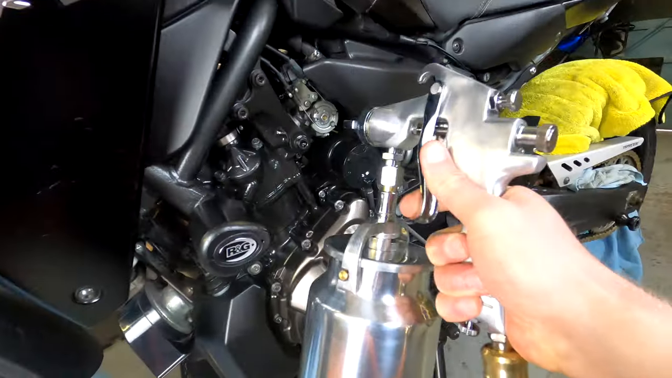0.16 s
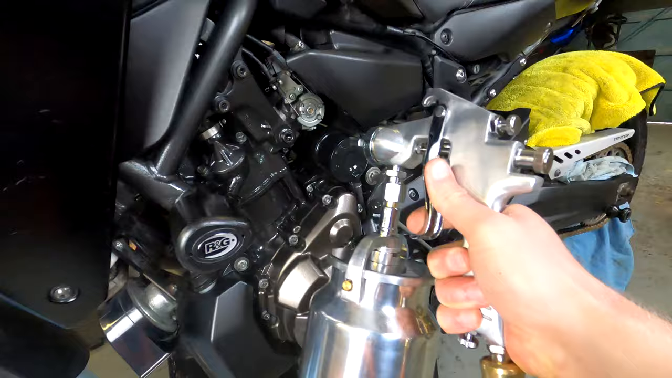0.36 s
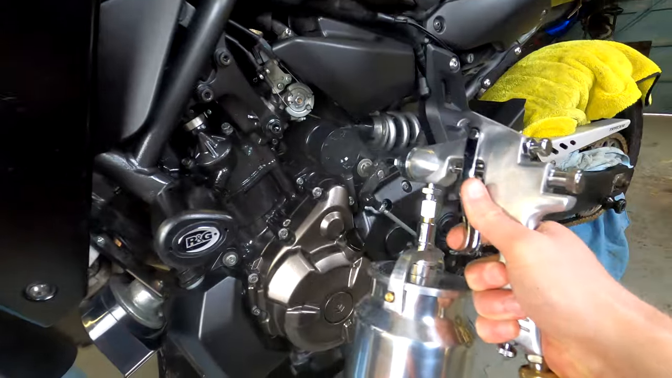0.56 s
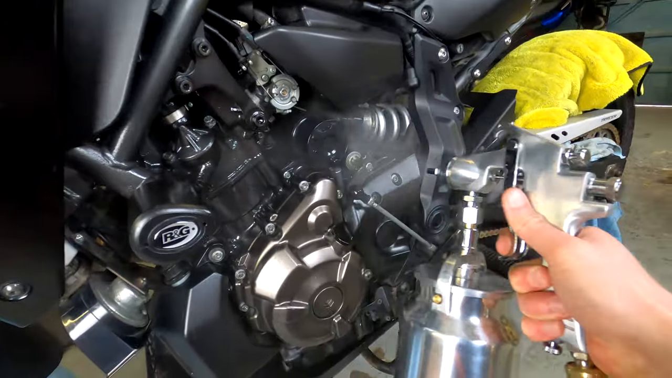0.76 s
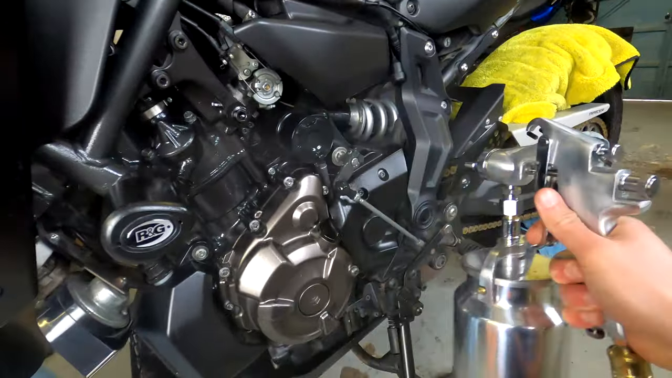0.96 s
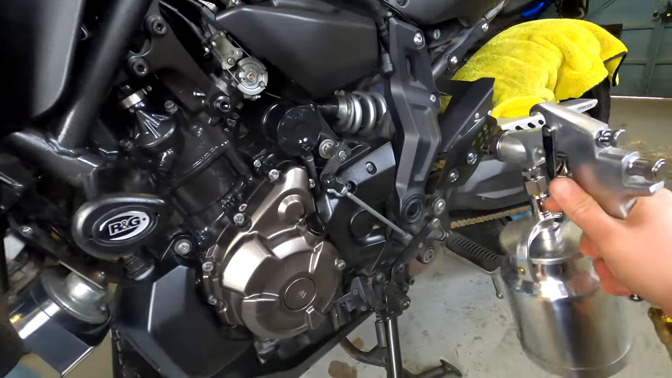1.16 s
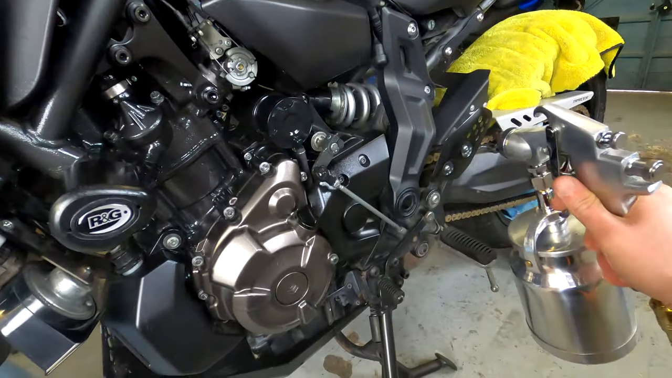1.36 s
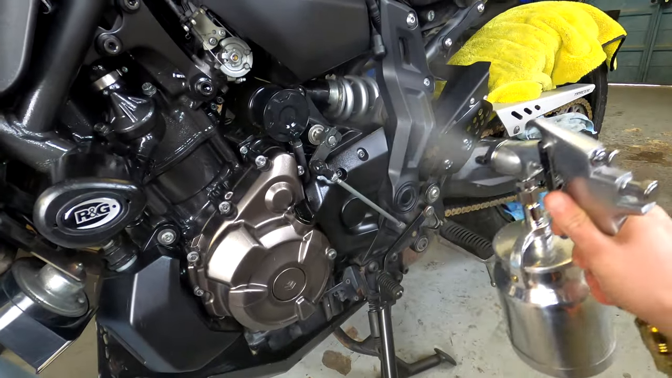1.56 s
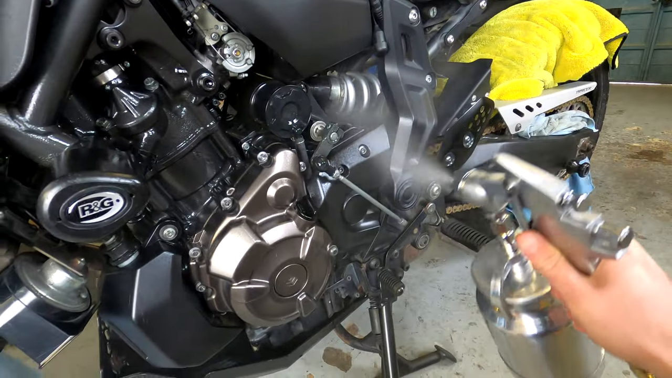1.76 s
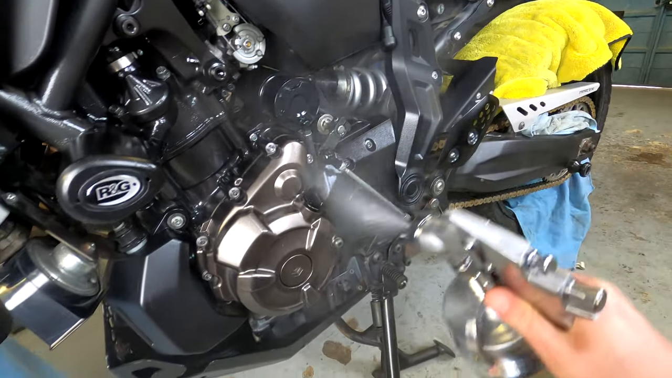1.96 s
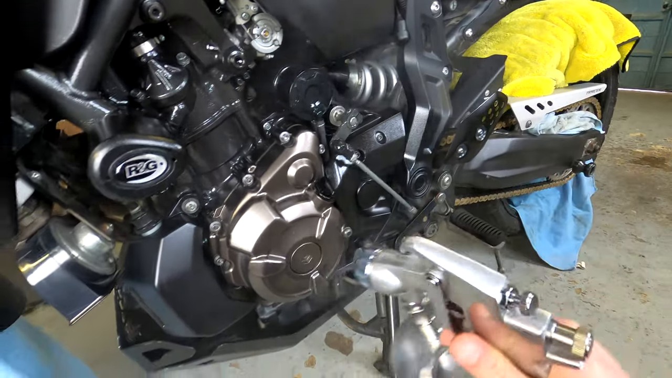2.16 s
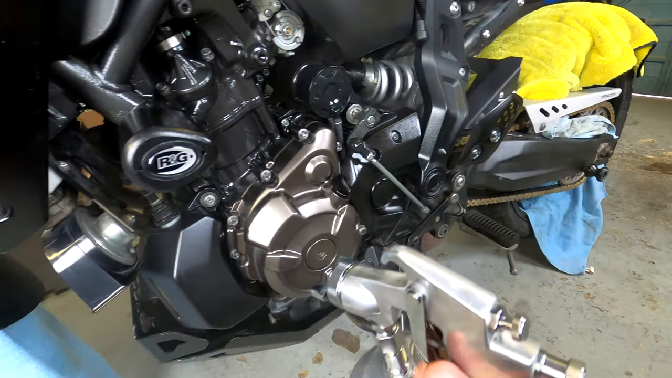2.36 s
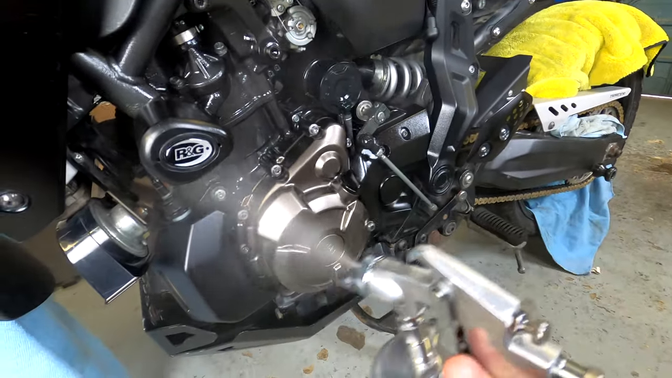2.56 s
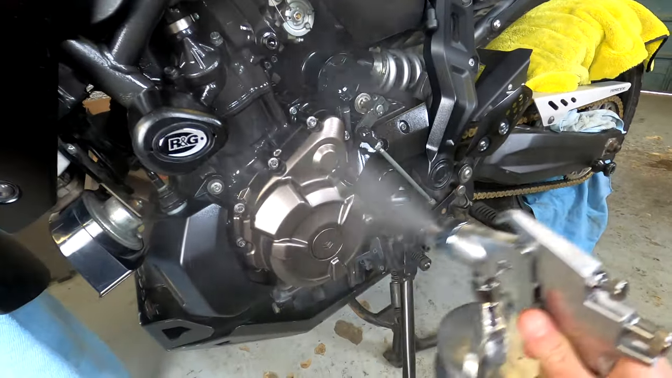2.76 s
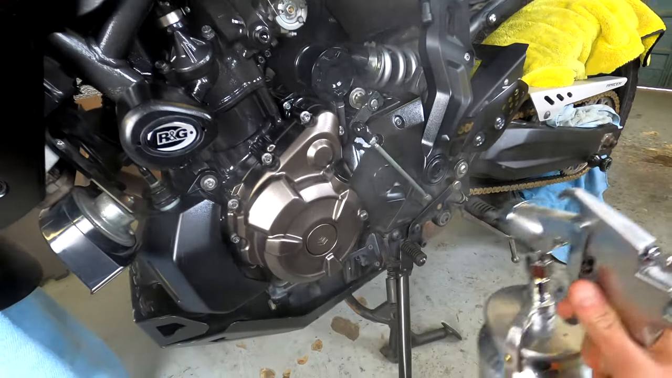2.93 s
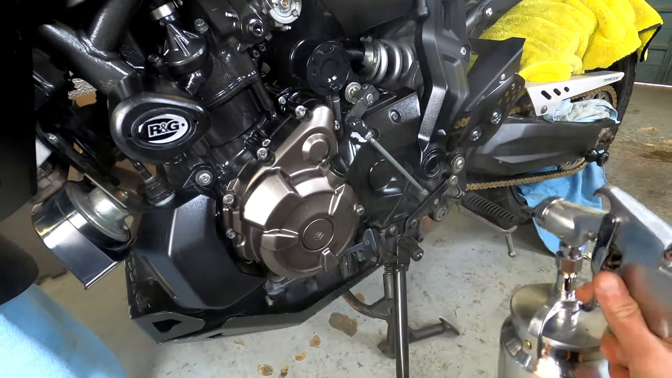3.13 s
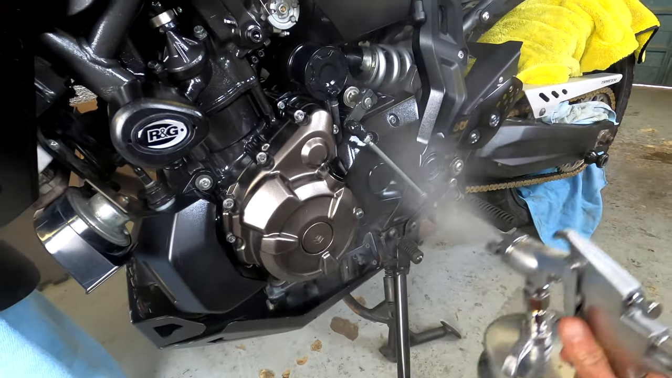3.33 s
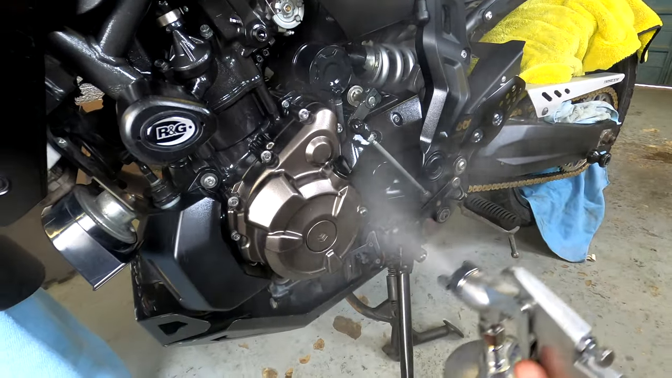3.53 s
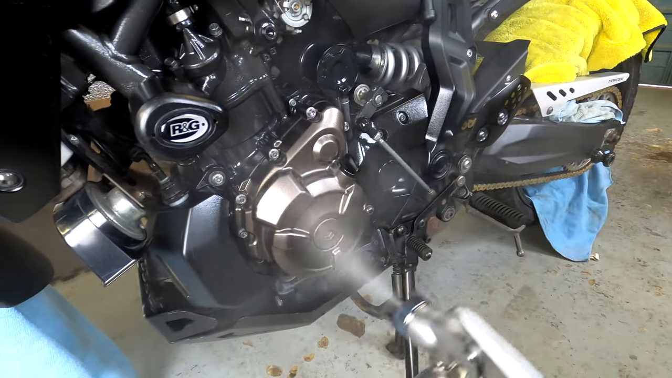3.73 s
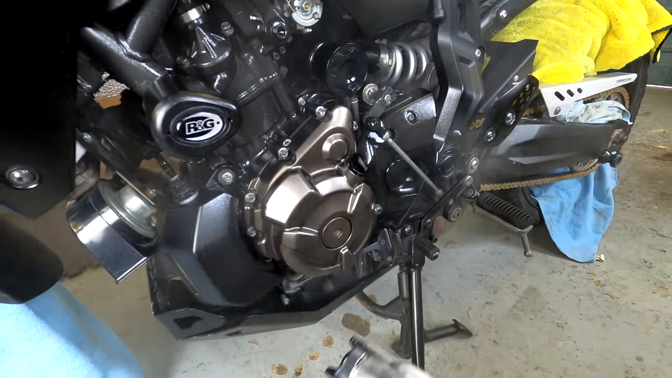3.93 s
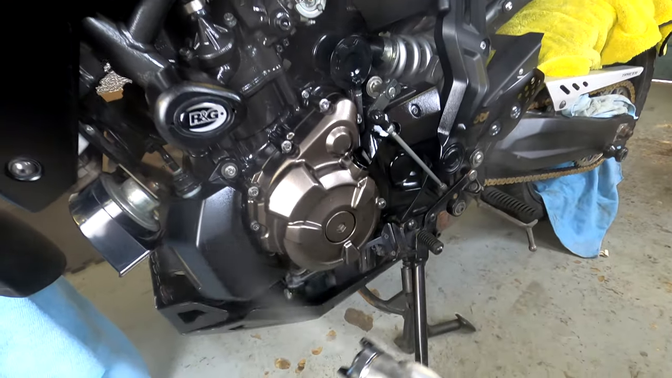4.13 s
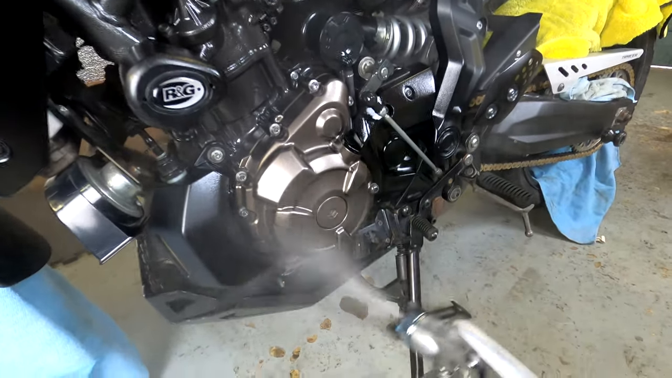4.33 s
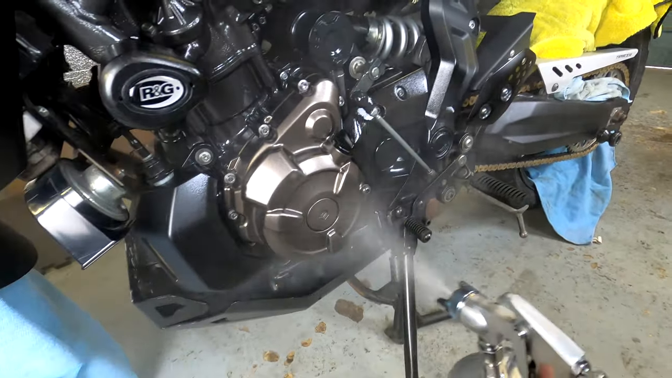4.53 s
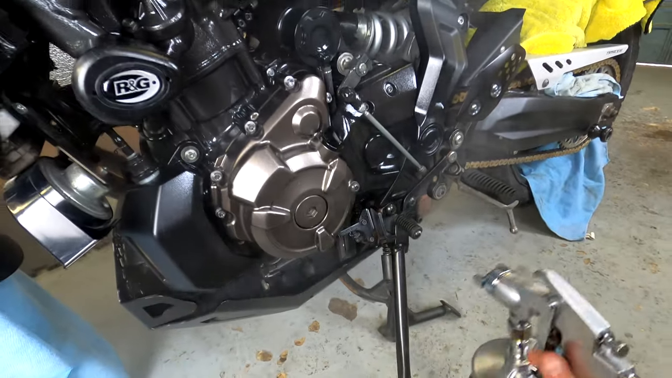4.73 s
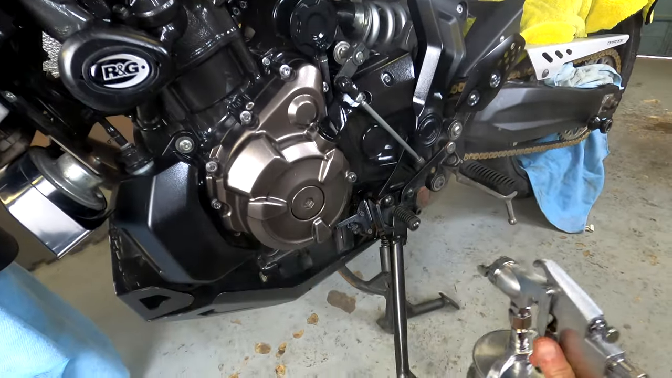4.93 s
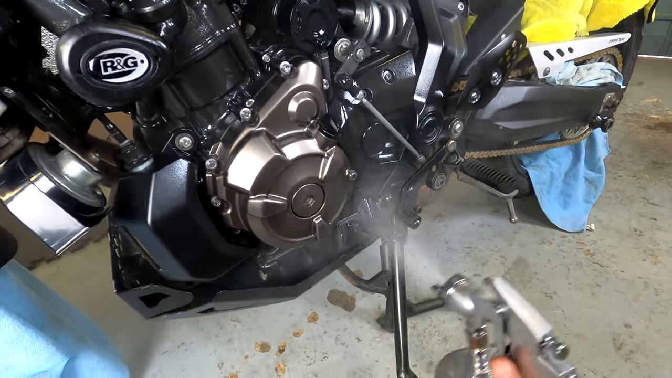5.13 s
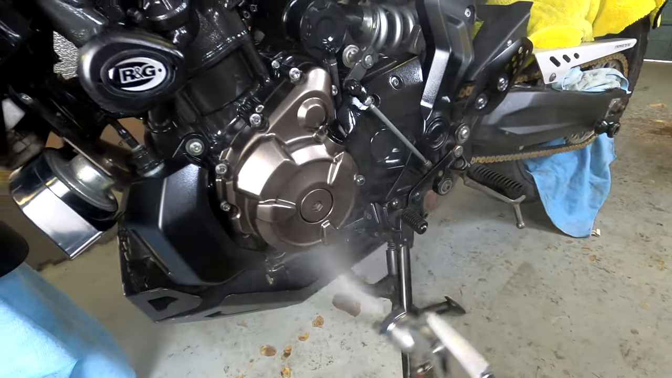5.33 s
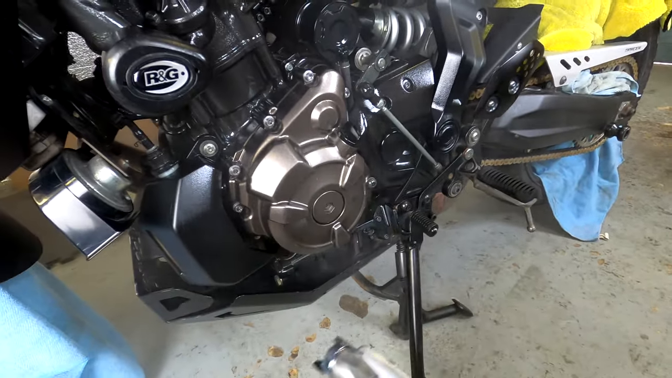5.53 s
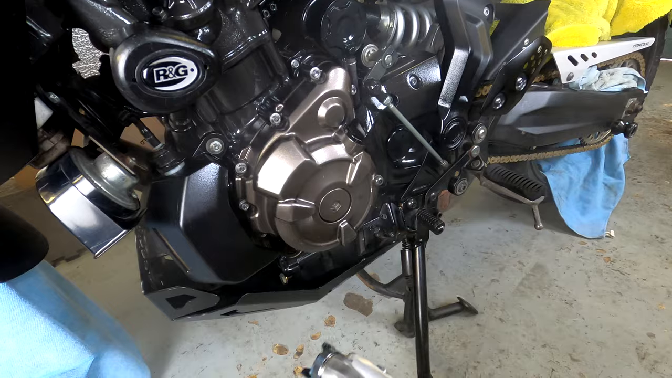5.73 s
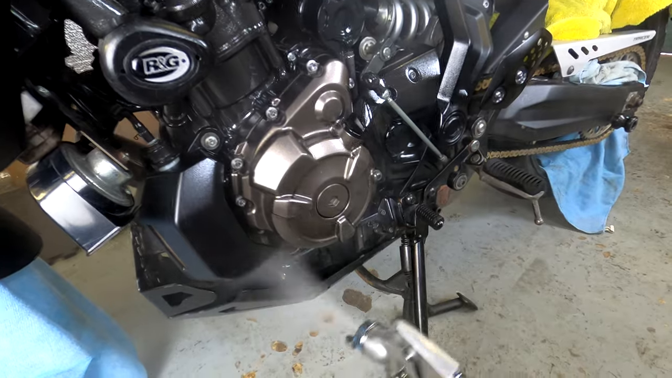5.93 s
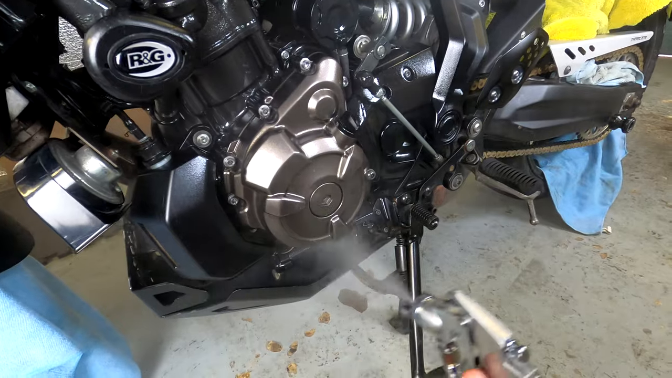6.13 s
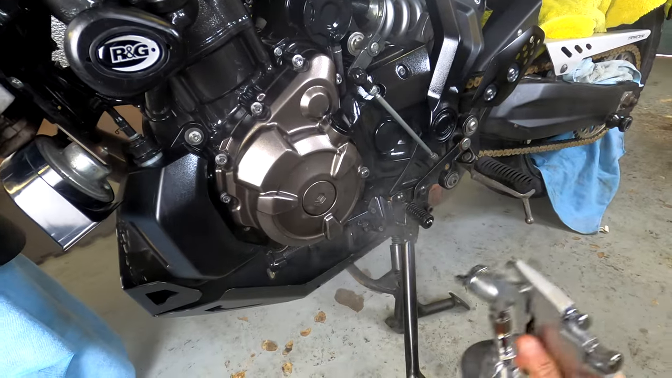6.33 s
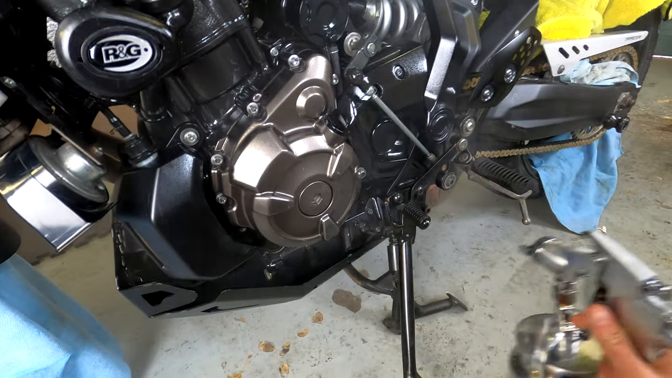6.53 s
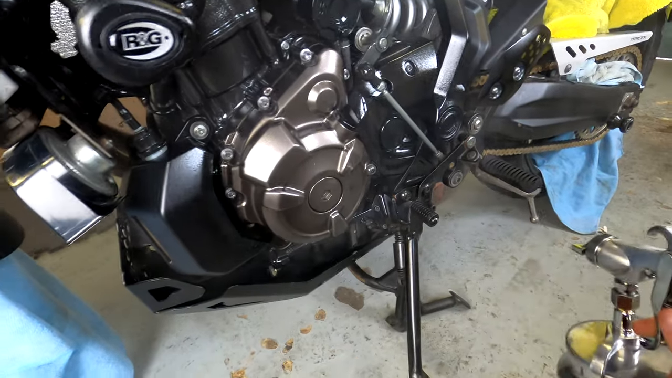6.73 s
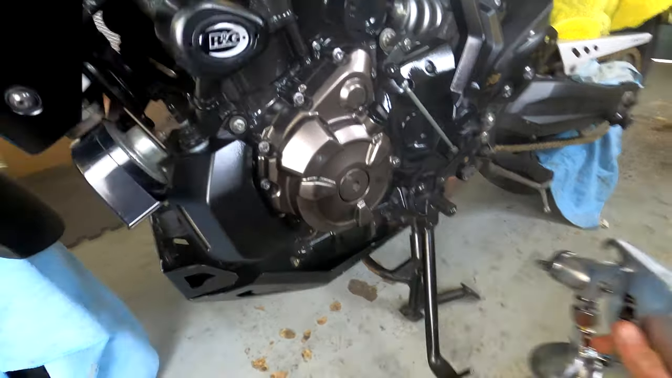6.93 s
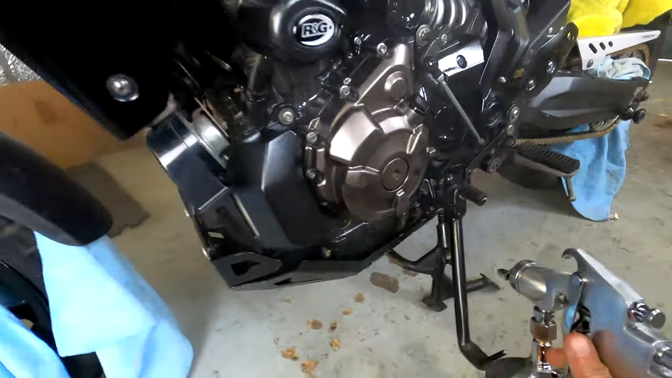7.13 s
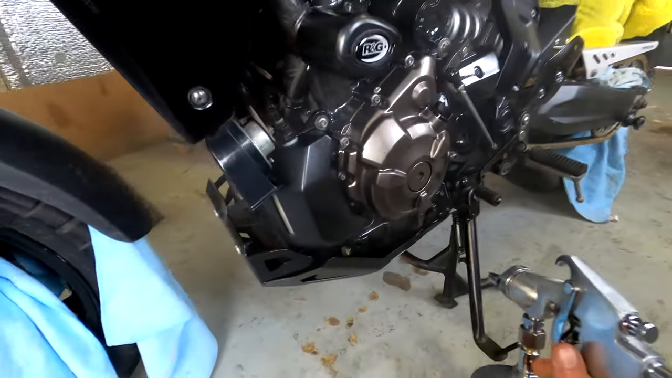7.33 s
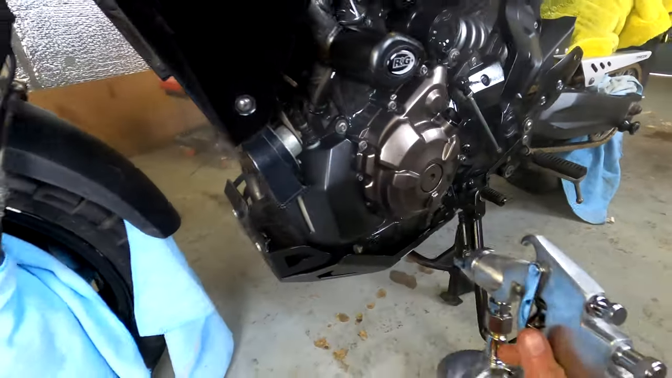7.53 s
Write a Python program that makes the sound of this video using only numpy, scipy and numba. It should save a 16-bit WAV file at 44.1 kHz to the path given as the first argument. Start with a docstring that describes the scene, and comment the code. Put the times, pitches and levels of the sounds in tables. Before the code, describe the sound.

Seven loud, airy spray bursts, roughly two thirds of a second each after a longer first one, with short gaps between. The hiss starts hard, sags as pressure drops, and mixes with wet splashing in engine cavities. Every release gives a soft pop and a brief ring from the gun. Faint air leakage and cloth fill the pauses, then comes a short shoe scuff. Close stereo pickup, small garage, short echo, quiet low room tone.

```python
"""Spray gun on an engine, small garage

A compressed-air spray gun coats a motorcycle engine in seven bursts, an arm's length from the microphone.
Each burst is shaped noise: a bright nozzle hiss that settles as the hose pressure sags, and a splash that
rings in the engine's hollows. A pressure pulse thumps as the valve shuts; small ticks ring the gun.
Filtered noise makes the leak whistle after the first release, the cloth, a late shoe scuff and a low rumble
under low drones; all but rumble, room tone, puffs and drones echo off the close walls."""
import sys
import numpy as np
from scipy import signal
from scipy.fft import rfft, irfft, next_fast_len
from scipy.io import wavfile
from numba import njit

SR = 44100
rng = np.random.default_rng(int(sys.argv[2]) if len(sys.argv) > 2 else 0)


def to_wav(s):
    """Save 16-bit WAV."""
    ch = np.atleast_2d(s).T  # columns
    pcm = np.round(np.clip(ch, -1, 1) * 32767)  # PCM
    wavfile.write(sys.argv[1], SR, pcm.astype(np.int16))


N = 338952
FFT_SIZE = next_fast_len(N)
T, HZ = np.arange(N) / SR, np.fft.rfftfreq(FFT_SIZE, 1 / SR)

# Trigger pulls, levels before the trims in the functions: start_s, end_s, opening_s, surge_db,
#   splash_first_db, splash_last_db, nozzle_db, release_flare_db, hollow_first_hz, hollow_last_hz,
#   puff_db, thump_db
PULLS = [(0.275, 1.172, 0.024, 12.5, -29.5, -28, -32.5, 0, 3890, 3690, -37, -20.5),
         (1.529, 2.2714, 0.018, 11, -28.5, -26, -34, 4, 3780, 3820, -42.5, -22),
         (2.488, 3.114, 0.017, 13.5, -25.5, -28.5, -35, 1.5, 3760, 3800, -45.5, -24.5),
         (3.283, 4.0254, 0.015, 8.5, -28, -25.5, -34.5, 5, 3790, 3650, -51, -22.5),
         (4.183, 4.837, 0.02, 12, -25.5, -27.5, -34, 1.5, 3510, 3700, -51, -22.5),
         (5.033, 5.647, 0.016, 10.5, -28, -26.5, -35, 4.5, 3520, 3600, -44.5, -21),
         (5.881, 6.552, 0.022, 15, -27.5, -27, -35, 1, 3600, 4440, -40.5, -23.5)]
# Colour of the jet hitting the engine: frequency_hz, relative_level_db
SPLASH_COLOUR = [(150, -17), (450, -18), (620, -13), (850, -11), (1100, -8), (1600, -7), (2200, -3.5),
                 (3400, -1.5), (5000, -3), (6500, -4.5), (9000, -67.5), (15000, -43)]
# Colour of the air leaving the nozzle: frequency_hz, relative_level_db
NOZZLE_COLOUR = [(400, -22.5), (1500, -14), (3000, -7), (5000, -1), (6400, 2), (7300, 2), (7800, 1.5),
                 (8200, 0), (8700, -1), (9600, -2), (11000, -7), (12300, -7), (14000, -13), (16000, -21)]
# Colour of the whistle past the shut valve: frequency_hz, relative_level_db
LEAK_COLOUR = [(2000, -36), (5600, -20), (6100, -5.5), (6450, 9.5), (6900, -4), (7500, -3), (8900, -30),
               (10200, -8), (10900, -18), (13400, -20), (16000, -40)]
# Colour of air puffing on the microphone: frequency_hz, relative_level_db
PUFF_COLOUR = [(30, -18.5), (90, -0.5), (150, -0.5), (200, -4), (270, -1), (400, -13.5), (800, -20.5),
               (2000, -67)]
# Colour of the sole on concrete: frequency_hz, relative_level_db
SCUFF_COLOUR = [(350, -40.5), (600, -10.5), (863, -30), (923, -14), (1400, -4), (2130, -3.5), (5040, -11.5),
                (5840, -11), (6420, -10), (15000, -42)]
# Colour of the room tone: frequency_hz, relative_level_db
ROOM_COLOUR = [(20, -20), (60, -2), (100, 0), (250, -4), (350, -9), (450, -17), (650, -23), (1000, -24),
               (2000, -30), (4000, -35), (7000, -39), (10000, -50), (15000, -70)]
# Colour of the low rumble: frequency_hz, relative_level_db
RUMBLE_COLOUR = [(20, -25), (40, -15), (61, -6), (87, 3), (115, -8.5), (190, -12), (330, -14), (700, -43.5),
                 (8000, -120)]
# Colour of cloth and hose: frequency_hz, relative_level_db
CLOTH_COLOUR = [(150, -39.5), (330, 15), (550, 3.5), (800, 5.5), (1300, 10), (2400, 3.5), (5000, -1),
                (8000, -6.5), (15000, -43)]
# Colour of a small metal tick: frequency_hz, relative_level_db
TICK_COLOUR = [(200, -17), (900, -4), (3000, -6), (6000, -5), (10000, -28), (15000, -35)]
# Ticks of the gun in the hand and of the trigger reaching its first stop: start_s, level_db
HAND_TICKS = [(1.455, -42.5), (2.448, -58), (3.208, -48.5), (7.408, -55.5)]
# Modes of the gun and its cup: pitch_hz, width_hz, relative_level_db
GUN_RINGS = [(1087, 45, 12.5), (1336, 220, 4.5), (1920, 180, 6.5), (2320, 60, -9), (2780, 180, 6),
             (2990, 160, -22), (3640, 120, -15), (6060, 1500, -62)]
# Soft hollow sounds as the gun is drawn back, width before squaring:
#   centre_s, level_db, spread_s, pitch_hz, width_hz
HOLLOW_SOUNDS = [(6.622, -53, 0.094, 730, 646), (6.83, -40.5, 0.0065, 281, 50),
                 (6.866, -42, 0.029, 301, 30)]
# Sleeve and hose shifting: centre_s, level_db, spread_s
CLOTH_SHIFTS = [(2.475, -60, .015), (6.92, -61.5, 0.16), (7.31, -65, 0.043), (7.57, -69, 0.033)]
# Low wavering drones, level before wavering: start_s, end_s, first_pitch_hz, last_pitch_hz, level_db
LOW_DRONES = [(4.169, 5.028, 54, 63.5, -49.5), (5.62, 5.95, 86, 84.6, -52.5), (6.65, 7.04, 89.2, 86, -52.5),
              (7.325, 7.652, 86.7, 86.4, -49)]
# Likeness of the noise at the two microphone ports: frequency_hz, shared_fraction (the ports share the square
# root of this fraction of their noise power)
PORT_LIKENESS = [(60, 1), (300, 0.64), (1200, 0.85), (3500, 0.78), (5500, 0.39), (8500, 0.25), (11000, .18),
                 (15000, .03)]
# Level difference of the ports: frequency_hz, left_minus_right_db
PORT_TILT = [(100, 0.5), (700, -0.5), (1300, -.5), (2400, 1.5), (4400, 0), (6200, 0), (7200, -0.5),
             (8000, -2.5), (8700, -9), (9700, -2), (12000, -6.5), (15000, -7.5)]
# Phase by which the left port lags: frequency_hz, lag_radians
PORT_LAG = [(50, 0.35), (1000, 0.42), (3000, 0.89), (5300, 1.25), (7400, 2.22), (9300, 1.04), (13000, 1.5)]

# every pull: stored pressure drains, the splash dips briefly, and the trigger is eased off
SAG_S, SPLASH_SURGE_SHARE = 0.2, 0.04
DIP_AFTER_S, DIP_S, DIP_DB = 0.29, 0.052, -1
RELEASE_S, RELEASE_DB, FLARE_S = 0.13, -2.5, 0.19
# the air cap's shrill band, fading as the gun moves away from the microphone
SHRILL_DB, SHRILL_FADE_DB_PER_S, SHRILL_FAR_DB = -37, 5, -52.5
REFLECTION_SHARE = 0.17
# the leak lasts from the first release until the gun is put aside
LEAK_DB, LEAK_ENDS_S, LEAK_FADE_S = -70, 6.75, 0.06
# a shoe slides on concrete and slows down
SCUFF_STARTS_S, SCUFF_STOPS_S, SCUFF_ATTACK_S, SCUFF_RELEASE_S = 6.795, 7.065, 0.0065, 0.018
SCUFF_DB, SCUFF_FADE_DB_PER_S = -46, 14
CLOTH_DB, CLOTH_STARTS_S, CLOTH_RISE_S = -68, 1.4, 2
# room tone and rumble both grow as the microphone draws back from the engine
ROOM_DB, ROOM_RISE_DB_PER_S = -56.5, 0.24
RUMBLE_DB, RUMBLE_RISE_DB_PER_S = -61, 1.04
PUFF_AFTER_S, PUFF_S = 0.082, 0.04
TOP_HZ = 15950


def spray(hollow_db=-4, hollow_width_hz=1540.0, flutter_db=0.83, splash_trim_db=-2, nozzle_trim_db=1.0,
          tearing_db=0.5, aim_share=0.026):
    """The valve lets out a jet that hisses at the nozzle and splashes into the hollows of the engine."""
    valve, splash_level, nozzle_level, hollow_hz = pulls()
    # the hand never holds its aim quite still
    hollow_hz = hollow_hz * (1 + aim_share * walk(4))
    splash = hiss(SPLASH_COLOUR)
    hollow = np.array([bandpass(side, hollow_hz, hollow_width_hz) for side in splash])
    splash = unit(splash + undb(hollow_db) * hollow)
    splash = splash * undb(splash_trim_db + splash_level + flutter_db * walk(40))
    nozzle = hiss(NOZZLE_COLOUR) * undb(nozzle_trim_db + nozzle_level + flutter_db * walk(60))
    shrill_level = np.maximum(SHRILL_DB - SHRILL_FADE_DB_PER_S * T, SHRILL_FAR_DB)
    shrill = noise(resonance(8750, 1000) ** 2) * undb(shrill_level)
    # nozzle hiss needs full flow, so it comes last and goes first
    jet = valve * (splash + np.sqrt(valve) * (nozzle + shrill))
    # liquid tears off the nozzle unevenly
    return reflections(jet * undb(tearing_db * walk(500)))


def pulls(closing_s=0.014):
    """Trigger and aim set the valve opening, splash level, nozzle level and pitch of the hollow hit."""
    valve, splash_db, nozzle_db = np.zeros((3, N))
    hollow_hz = np.full(N, SR / 10)
    for (start, end, opening_s, surge, first_db, last_db, hiss_db, flare_db,
         first_hz, last_hz, _, _) in PULLS:
        held = (T > start) & (T < end)
        age, left = T[held] - start, end - T[held]
        sweep = age / (end - start)
        surge_db = surge * ramp(1 - age / SAG_S)
        easing_db = RELEASE_DB * ramp(1 - left / RELEASE_S)
        dip_db = DIP_DB * np.exp(-0.5 * ((age - DIP_AFTER_S) / DIP_S) ** 2)
        valve[held] = ramp(age / opening_s) ** 2 * ramp(left / closing_s)
        splash_db[held] = first_db + (last_db - first_db) * sweep
        splash_db[held] += SPLASH_SURGE_SHARE * surge_db + dip_db + easing_db
        # as the liquid stops ahead of the air, the dry jet hisses more brightly
        drying_db = flare_db * ramp(2 * (1 - left / FLARE_S))
        nozzle_db[held] = hiss_db + surge_db + drying_db + easing_db / 2
        hollow_hz[held] = first_hz + (last_hz - first_hz) * sweep
    return valve, splash_db, nozzle_db, hollow_hz


def reflections(x, nearest_s=0.0005, farthest_s=0.0018, sway_s=0.0001, above_hz=5500, count=3):
    """Small engine parts throw back only the treble; the paths change with the hand, so the combs drift."""
    out = x.copy()
    treble = signal.sosfilt(signal.butter(2, above_hz, "high", fs=SR, output="sos"), x)
    for lag in np.geomspace(nearest_s, farthest_s, count):
        delay = np.round(SR * (lag + sway_s * walk(1.6))).astype(int)
        place = np.clip(np.arange(N) - delay, 0, N - 1)
        out += REFLECTION_SHARE * treble[:, place]
    return out


def thumps(width_s=0.0009, trim_db=-1, early_s=0.00077):
    """Stopping the flow sends out one short pressure pulse with a dip on either side."""
    out = np.zeros(N)
    for _, end, *_, thump_db in PULLS:
        u = (T - end + early_s) / width_s
        out += undb(thump_db + trim_db) * (np.exp(-u ** 2) - 0.3 * np.exp(-(u / 3) ** 2))
    return out


def trigger(ring_s=0.017, tick_s=0.004, tick_db=-2, seating_db=-20):
    """The trigger meets the needle, or the needle its seat: a tick, and the gun and its cup ring briefly."""
    seatings = [(end, thump_db + seating_db) for _, end, *_, thump_db in PULLS]
    knocks = list(HAND_TICKS) + seatings

    def fading(length):
        """Sudden onsets that die away exponentially."""
        return sum(undb(db) * np.exp(-np.abs(T - at) / length) * (T > at) for at, db in knocks)

    modes = sum(undb(db) * resonance(hz, width) for hz, width, db in GUN_RINGS)
    body = noise(undb(across(TICK_COLOUR)) * modes)
    return body * fading(ring_s) + undb(tick_db) * hiss(TICK_COLOUR) * fading(tick_s)


def leak():
    """A thin whistle of air slips past the valve from the first release on."""
    first_release = PULLS[0][1]
    fade = np.exp(-np.maximum(T - LEAK_ENDS_S, 0) / LEAK_FADE_S)
    return hiss(LEAK_COLOUR) * undb(LEAK_DB) * (T > first_release) * fade


def movement():
    """Stepping back: a sole scrapes, cloth and hose shift, something hollow sounds softly."""
    return scuff() + cloth() + hollow_sounds()


def scuff(fast_hz=5000.0, slow_hz=1790.0, grit_width_hz=4200.0, grit_db=-4):
    """Sole on concrete: the scrape dulls and fades as the sole slows down."""
    scrape = hiss(SCUFF_COLOUR)
    grit_hz = np.interp(T, [SCUFF_STARTS_S, SCUFF_STOPS_S], [fast_hz, slow_hz])
    grit = np.array([bandpass(side, grit_hz, grit_width_hz) for side in scrape])
    age = np.maximum(T - SCUFF_STARTS_S, 0)
    slide = ramp(age / SCUFF_ATTACK_S) * np.exp(-np.maximum(T - SCUFF_STOPS_S, 0) / SCUFF_RELEASE_S)
    return (scrape + undb(grit_db) * grit) * slide * undb(SCUFF_DB - SCUFF_FADE_DB_PER_S * age)


def cloth():
    """Rubbing fibres make a soft uneven noise once the arm sweeps to and fro, with a few stronger shifts."""
    stirring = undb(CLOTH_DB) * ramp((T - CLOTH_STARTS_S) / CLOTH_RISE_S)
    shifts = sum(undb(db) * swell(at, spread) for at, db, spread in CLOTH_SHIFTS)
    return hiss(CLOTH_COLOUR) * (stirring + shifts) * undb(1.3 * walk(40))


def hollow_sounds():
    """Narrow bands of noise swell and fade like air in a cavity."""
    return sum(undb(db) * swell(at, spread) * noise(resonance(hz, width) ** 2)
               for at, db, spread, hz, width in HOLLOW_SOUNDS)


def garage(x, wet_db=-9, count=36):
    """Gun and microphone keep moving, so each stretch of sound meets a different echo."""
    out, step = np.pad(x, ((0, 0), (0, SR))), N // count
    for centre in range(0, N + 1, step):
        span = np.arange(max(centre - step, 0), min(centre + step, N))
        # overlapping stretches keep constant power
        window = np.cos(np.pi / 2 * (span - centre) / step)
        echo = signal.fftconvolve(x[:, span] * window, wall_tail(), axes=1)
        out[:, span[0]:span[0] + echo.shape[1]] += undb(wet_db) * echo
    return out[:, :N]


def wall_tail(t60_low=0.29, t60_high=0.26, split_hz=5000, build_s=0.0089):
    """A short diffuse echo from the close walls; the treble dies first and differs between the ports."""
    t = T[:SR // 2]
    common, left, right = rng.standard_normal((3, len(t)))
    low = signal.sosfilt(signal.butter(2, split_hz, fs=SR, output="sos"), common)
    high = signal.sosfilt(signal.butter(2, split_hz, "high", fs=SR, output="sos"), [left, right])
    low_fade = np.exp(-np.log(1000) * t / t60_low)
    high_fade = np.exp(-np.log(1000) * t / t60_high)
    tail = (low * low_fade + high * high_fade) * ramp(t / build_s)
    return tail / np.sqrt(np.sum(tail ** 2) / 2)


def background():
    """Under the gun: room tone, rumble, puffs of air on the microphone and low drones."""
    room_tone = undb(ROOM_DB + ROOM_RISE_DB_PER_S * T) * hiss(ROOM_COLOUR)
    return room_tone + rumble() + puffs() + drone()


def rumble(waver_db=2, boom_db=-27, boom_s=0.057):
    """Low noise wavers, and jumps up and dies away after each thump."""
    booms = sum(undb(thump_db + boom_db) * np.exp(-np.abs(T - end) / boom_s) * (T > end)
                for _, end, *_, thump_db in PULLS)
    steady = undb(RUMBLE_DB + RUMBLE_RISE_DB_PER_S * T + waver_db * walk(3))
    return hiss(RUMBLE_COLOUR) * (steady + booms)


def puffs():
    """Moving air buffets the microphone in a low swell as each burst starts."""
    level = sum(undb(puff_db) * swell(start + PUFF_AFTER_S, PUFF_S) for start, *_, puff_db, _ in PULLS)
    return hiss(PUFF_COLOUR) * level


def drone(fade_s=0.08, waver_db=2):
    """A low wavering tone comes and goes, the same at both ports."""
    out, wobble = np.zeros(N), 1 + 0.015 * walk(10.2)
    for start, end, first_hz, last_hz, db in LOW_DRONES:
        hz = np.interp(T, [start, end], [first_hz, last_hz]) * wobble
        fade = ramp(np.minimum(T - start, end - T) / fade_s)
        out += undb(db) * fade * np.sin(2 * np.pi * np.cumsum(hz) / SR)
    # the root of 2 makes the table's levels rms
    return 2 ** 0.5 * out * undb(waver_db * walk(6.7))


def hiss(spectrum):
    """Noise with a (Hz, dB) spectrum."""
    return noise(undb(across(spectrum)))


def noise(response):
    """Noise of a given colour as the two ports hear it: alike in the bass, mostly unrelated in the treble."""
    common, left, right = rfft(rng.standard_normal((3, FFT_SIZE)))
    share = np.sqrt(np.clip(across(PORT_LIKENESS), 0, 1))
    ports = np.sqrt(share) * common + np.sqrt(1 - share) * np.array([left, right])
    # half of the level and phase difference goes to each port
    shade = undb(across(PORT_TILT) / 2) * np.exp(-0.5j * across(PORT_LAG))
    return unit(irfft(ports * np.array([shade, 1 / shade]) * response, FFT_SIZE)[:, :N])


def resonance(hz, width):
    """Frequency response of one mode, 1 at its centre."""
    return 1j * HZ * width / (hz ** 2 - HZ ** 2 + 1j * HZ * width)


@njit
def bandpass(x, hz, width):
    """State-variable resonance whose centre moves."""
    y, band, low = np.empty(len(x)), 0., 0.
    for i in range(len(x)):
        g, k = np.tan(np.pi * hz[i] / SR), width / hz[i]
        v = (band + g * (x[i] - low)) / (1 + g * (g + k))
        band, low, y[i] = 2 * v - band, low + 2 * g * v, k * v
    return y


def walk(rate):
    """Smooth chance with a spread of 1, slower than about the rate in Hz."""
    spectrum = rfft(rng.standard_normal(FFT_SIZE)) * np.exp(-(HZ / rate) ** 2) * (HZ > 0)
    return unit(irfft(spectrum, FFT_SIZE)[:N])


def swell(at, spread):
    """A bell-shaped envelope."""
    return np.exp(-0.5 * ((T - at) / spread) ** 2)


def across(points):
    """(Hz, value) points joined on a log-frequency axis."""
    hz, value = np.transpose(points)
    return np.interp(np.log(HZ + 1), np.log(hz), value)


def ramp(x):
    """Hold a value between 0 and 1."""
    return np.clip(x, 0, 1)


def undb(db):
    """Decibels to gain."""
    return 10 ** (np.asarray(db) / 20)


def unit(x):
    """Scale so that the mean of the channels has a standard deviation of 1."""
    return x / np.std(np.atleast_2d(x).mean(0))


def scene():
    """The gun and its user echo in the garage, over the background."""
    return garage(spray() + thumps() + trigger() + leak() + movement()) + background()


def record(dry):
    """The recorder cuts the top with a steep low-pass filter."""
    return signal.sosfilt(signal.ellip(12, 0.1, 80, TOP_HZ, fs=SR, output="sos"), dry)


dry = scene()
out = record(dry)
to_wav(out)
```